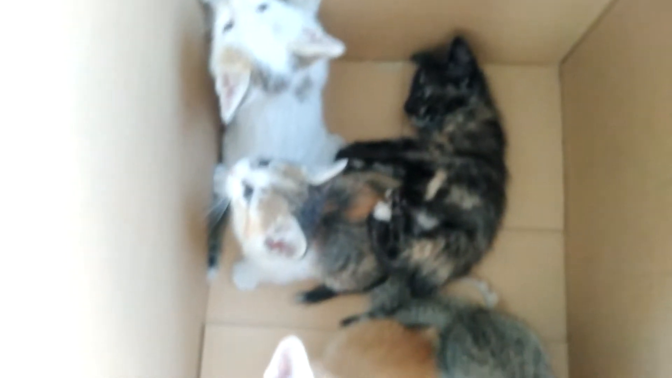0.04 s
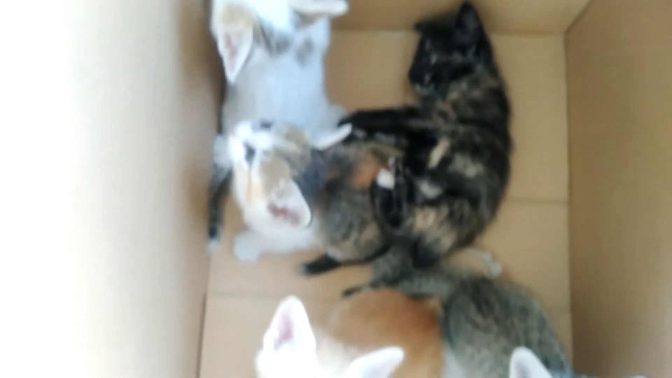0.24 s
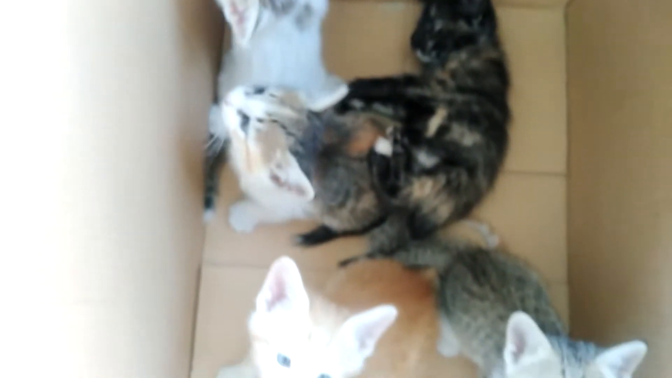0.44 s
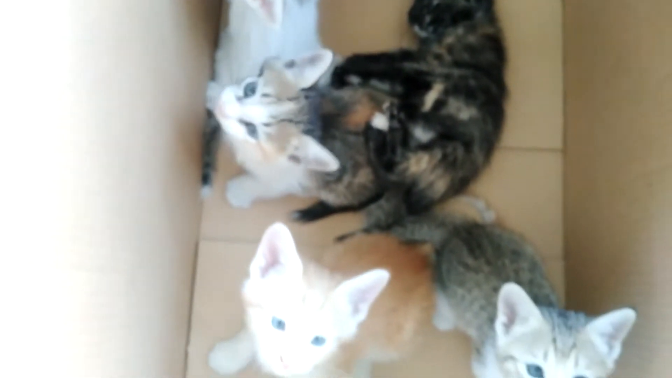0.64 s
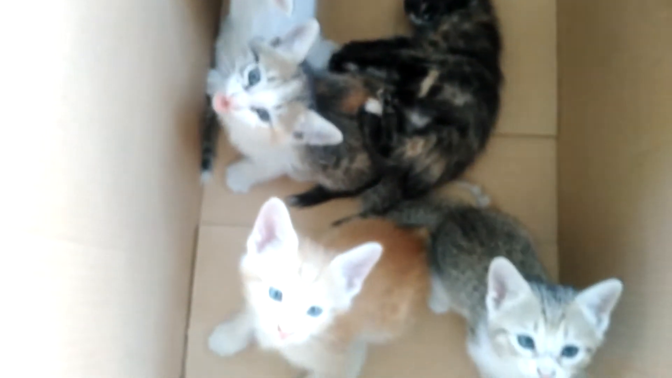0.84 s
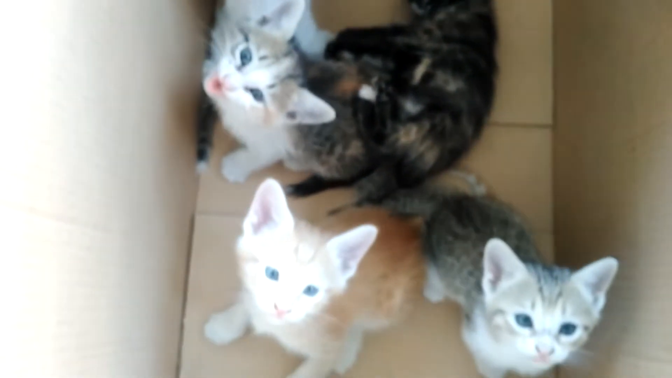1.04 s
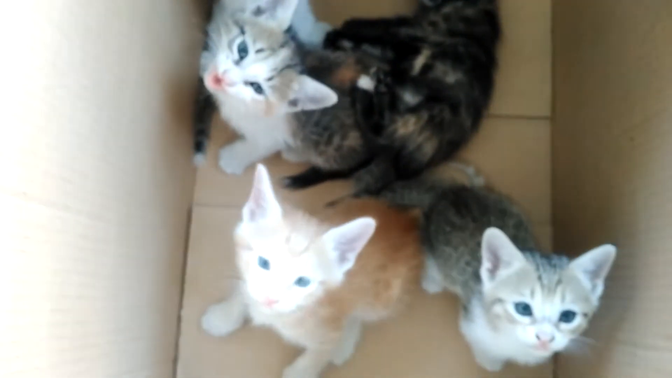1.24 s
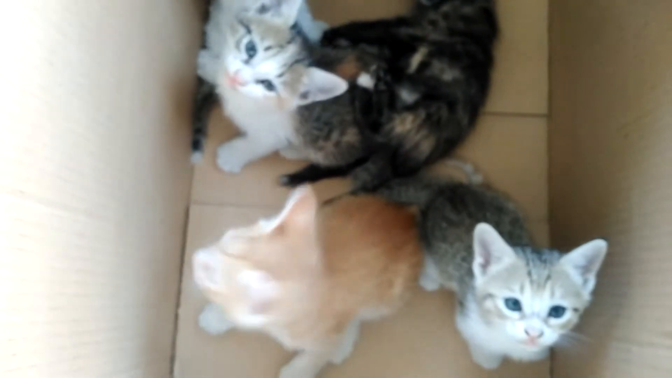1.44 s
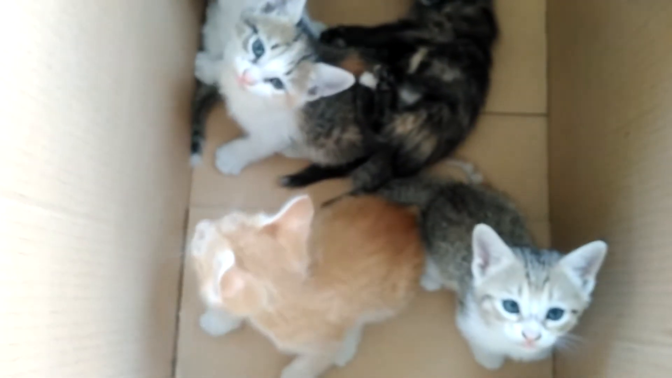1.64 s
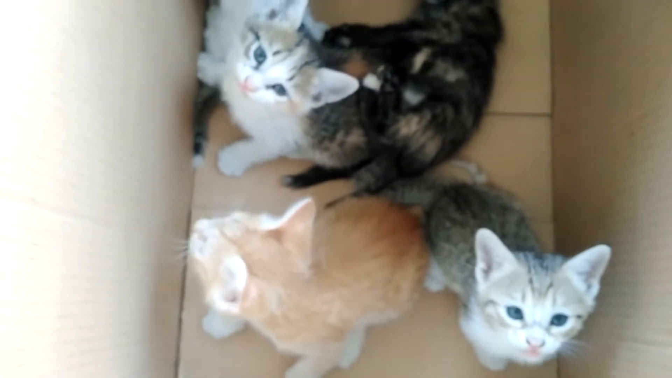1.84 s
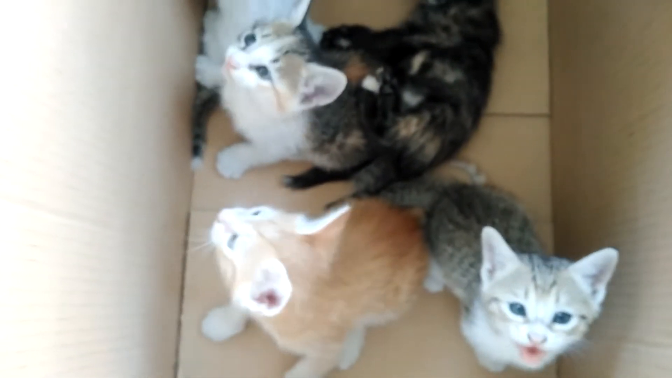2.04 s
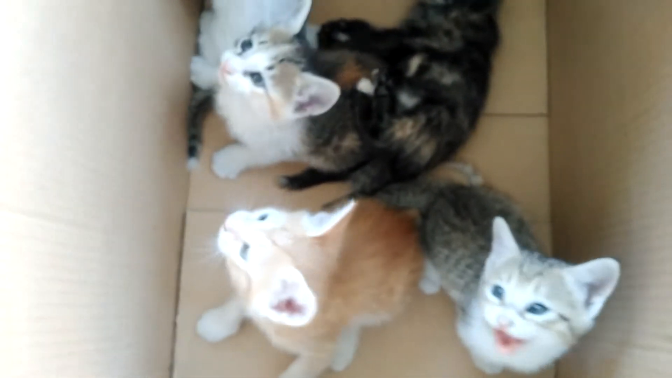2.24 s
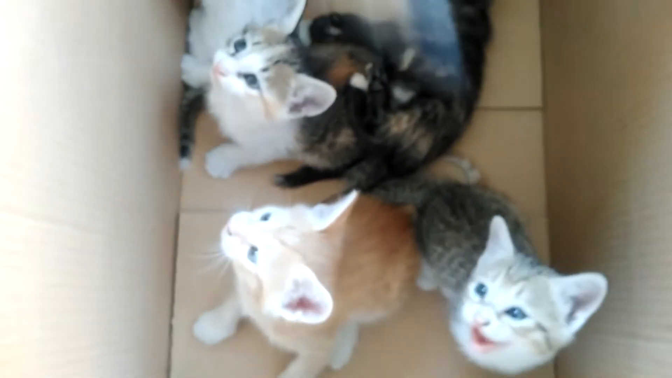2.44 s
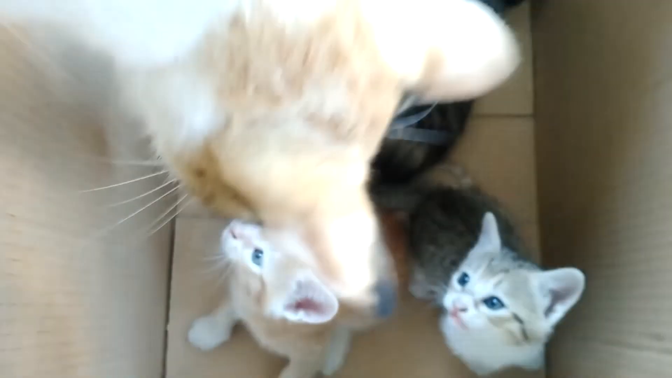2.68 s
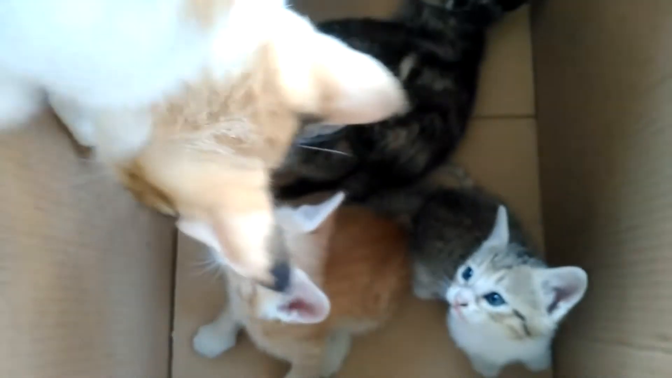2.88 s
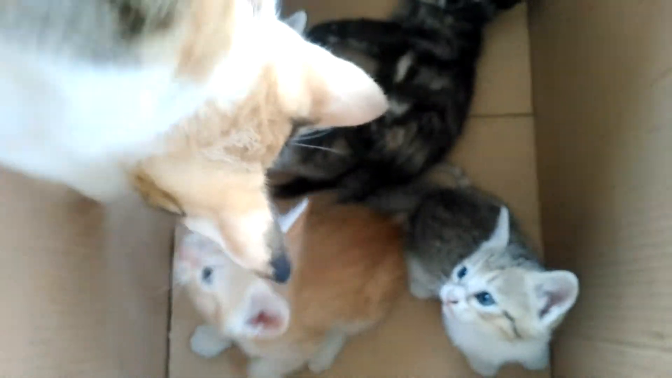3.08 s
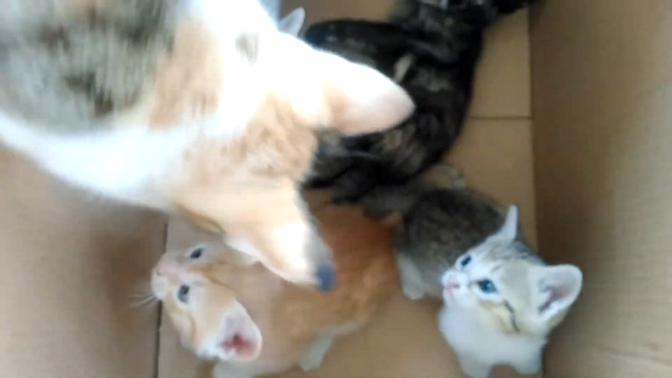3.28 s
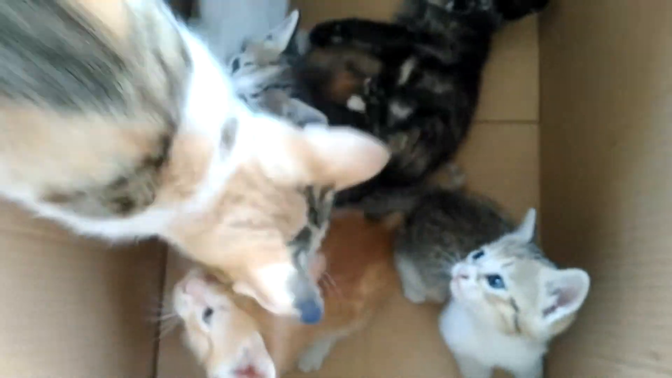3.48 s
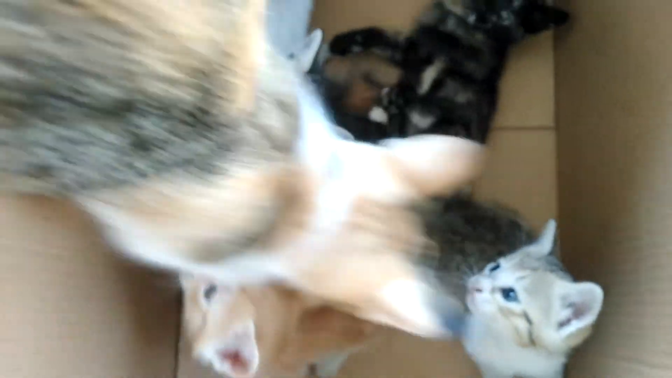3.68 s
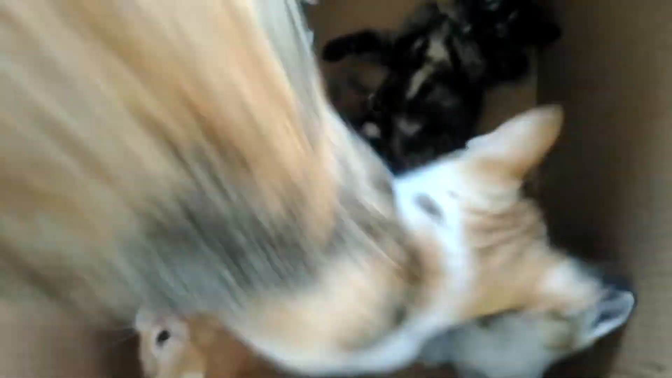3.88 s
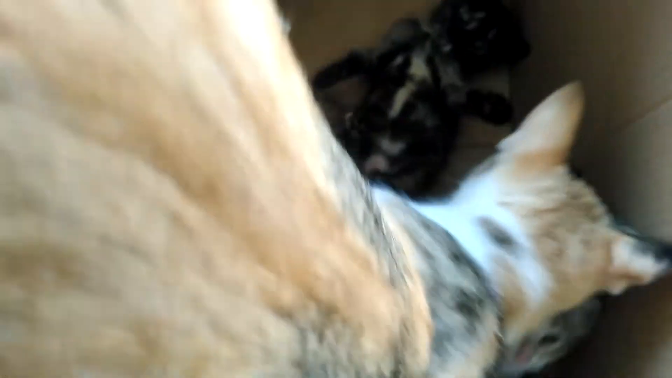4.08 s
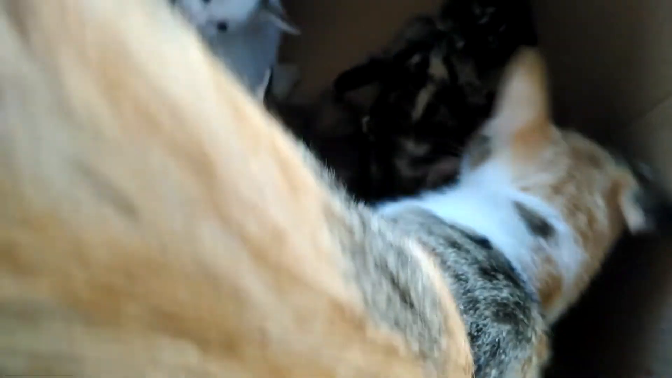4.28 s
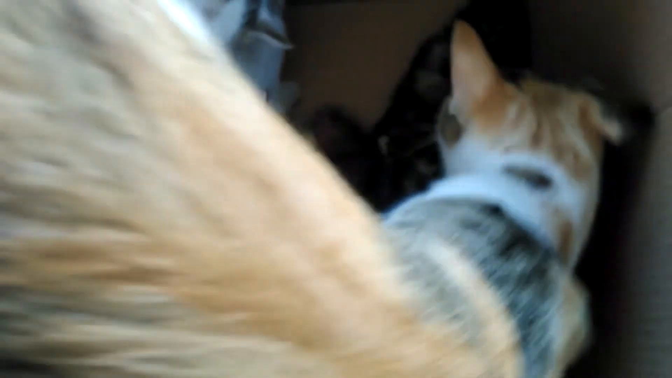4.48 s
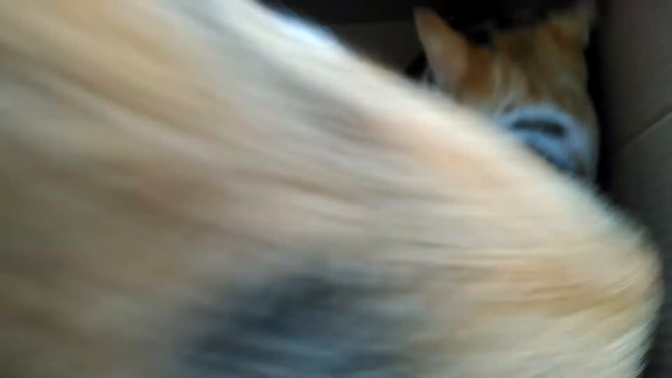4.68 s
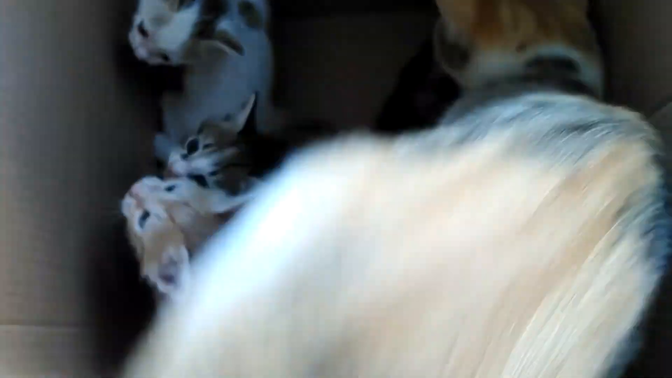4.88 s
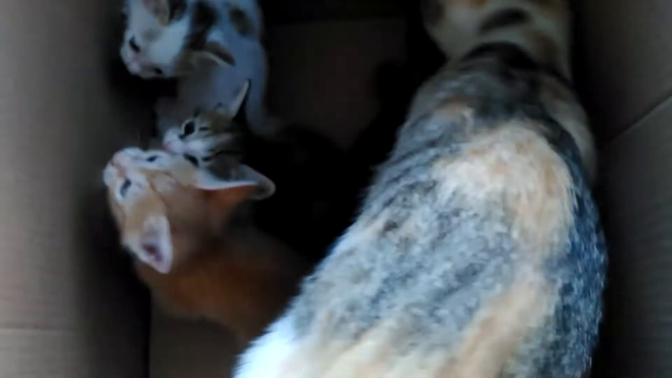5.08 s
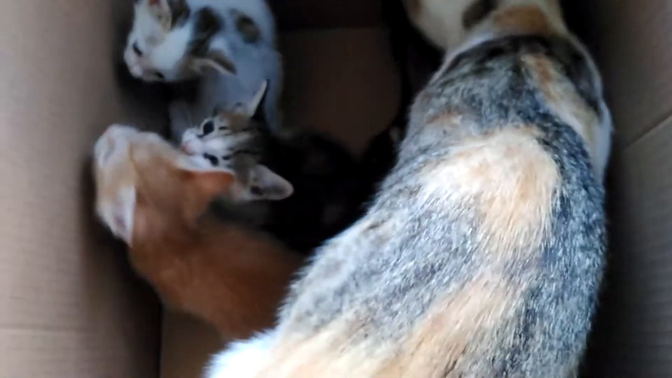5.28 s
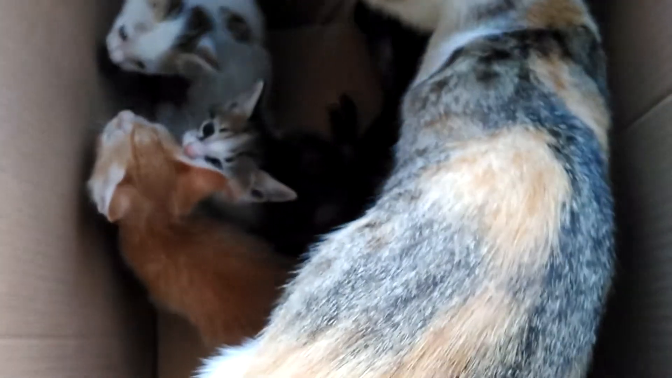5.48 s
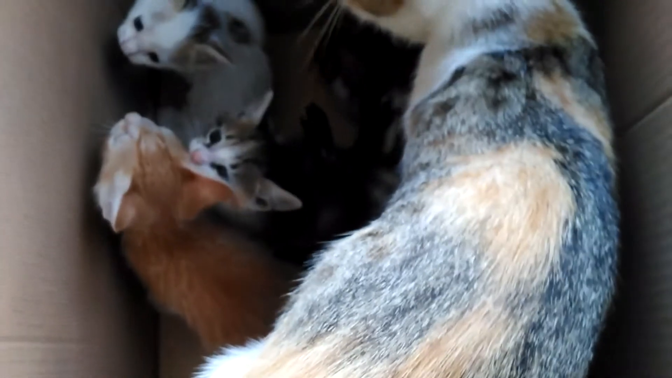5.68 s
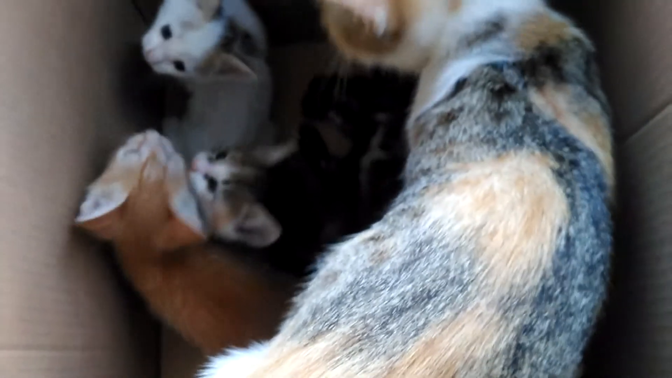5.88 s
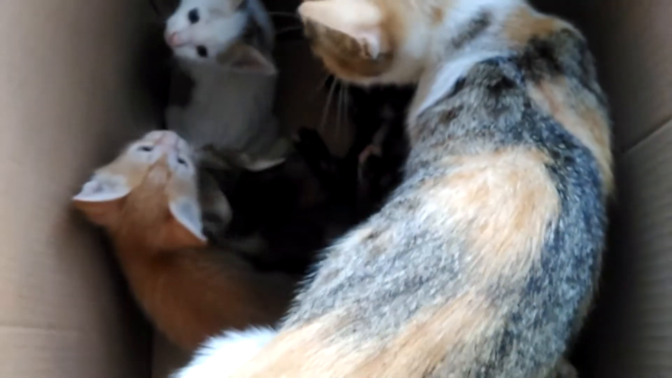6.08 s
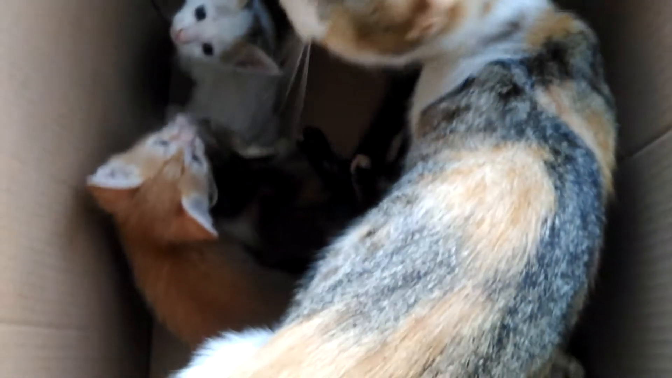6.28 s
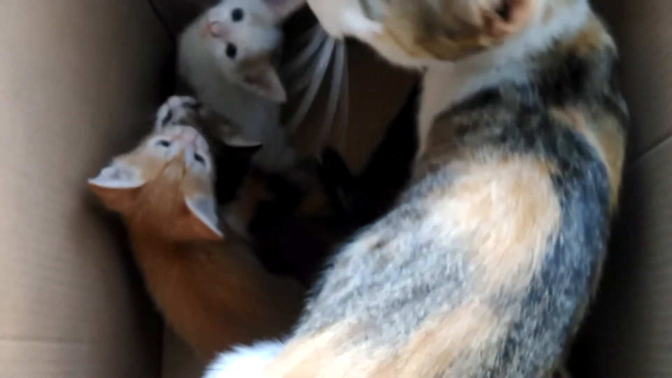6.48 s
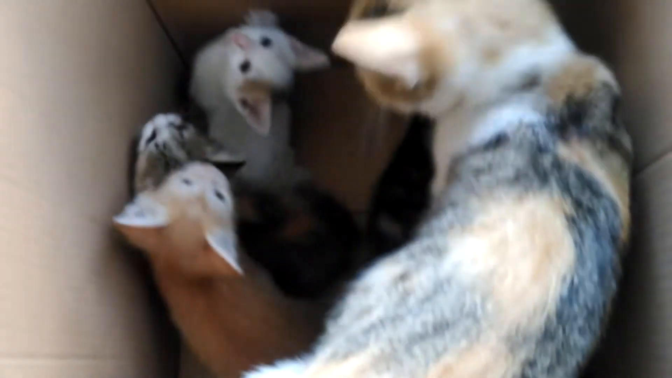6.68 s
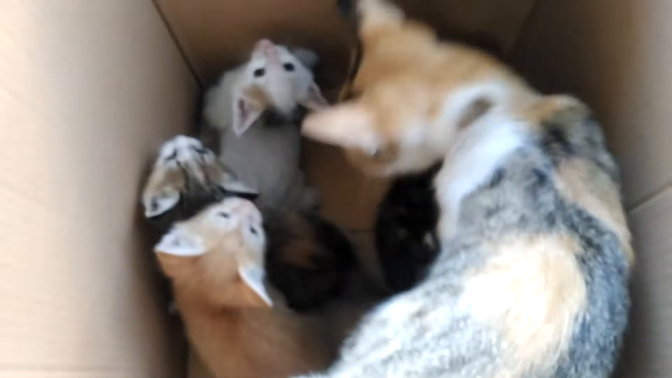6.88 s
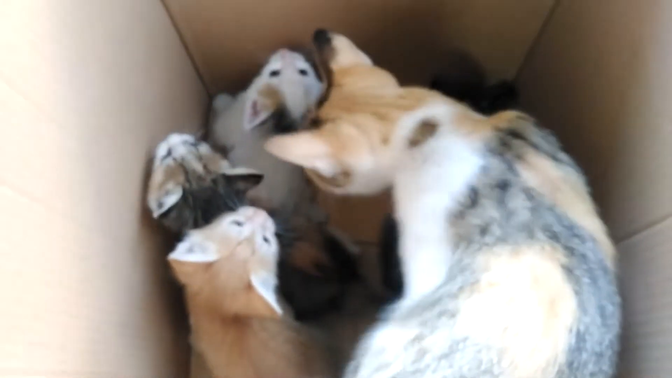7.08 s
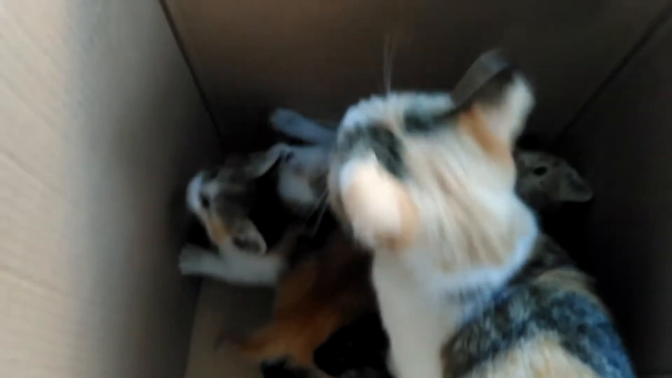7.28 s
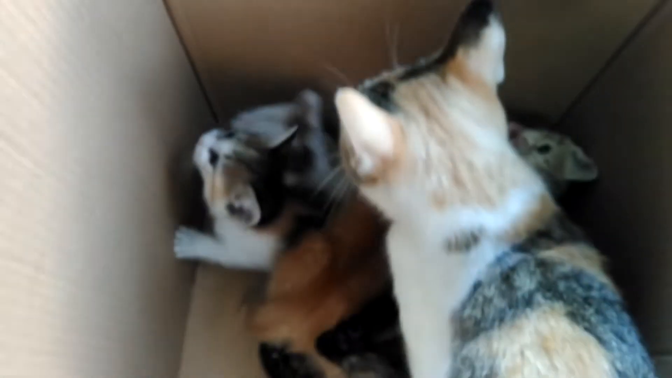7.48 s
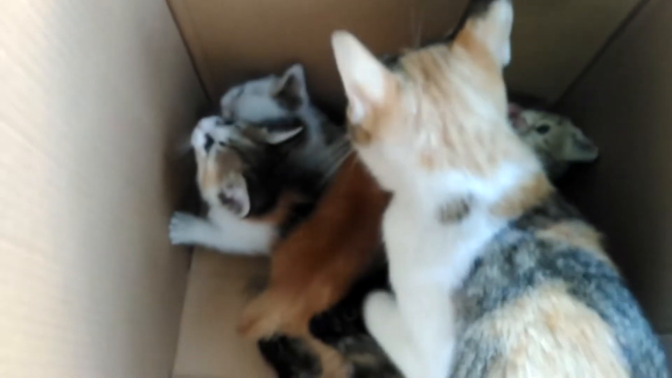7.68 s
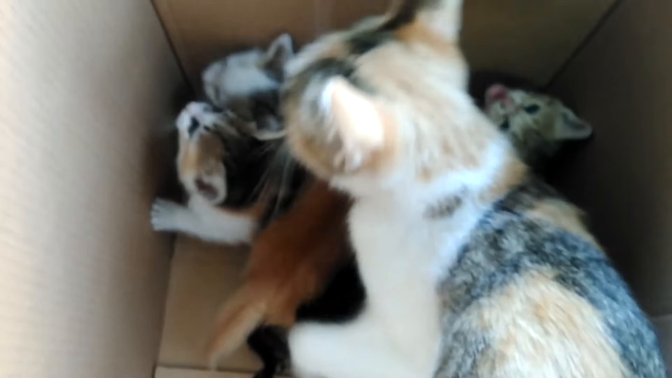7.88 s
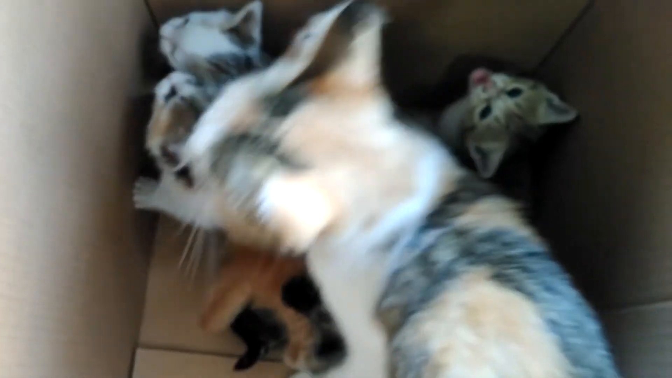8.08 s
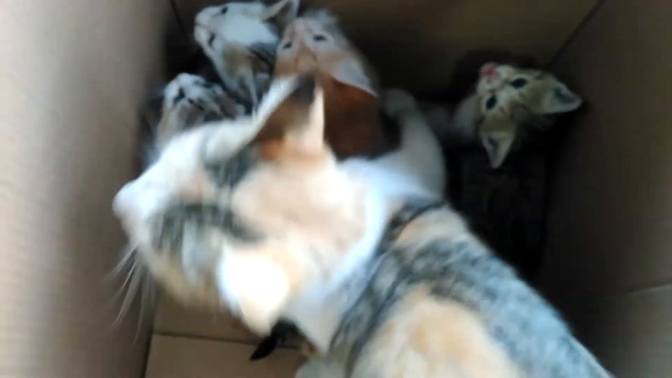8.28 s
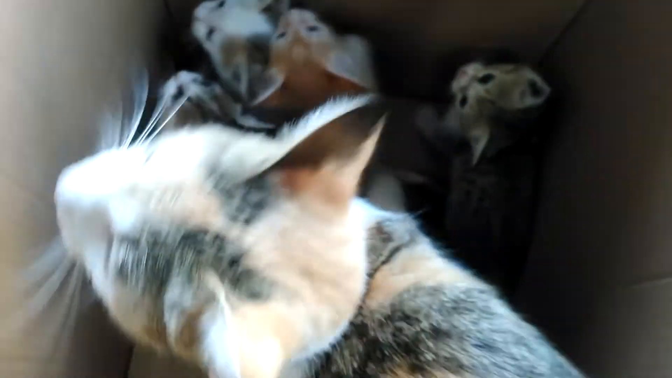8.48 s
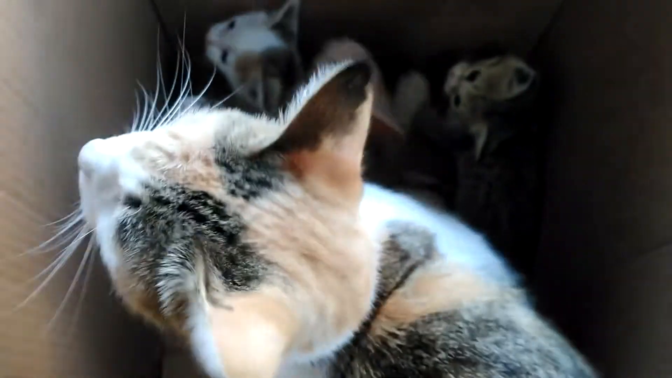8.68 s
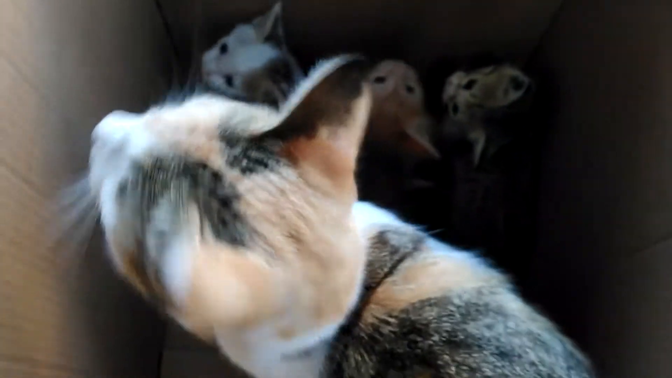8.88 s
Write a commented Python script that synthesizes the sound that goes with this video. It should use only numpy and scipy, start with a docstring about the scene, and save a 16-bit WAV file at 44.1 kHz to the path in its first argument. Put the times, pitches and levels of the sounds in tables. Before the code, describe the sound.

High, raspy kitten mews and a mother cat's quiet low trills, with paws thumping and fur rustling against cardboard.

```python
"""In a cardboard box, just below a hand-held phone, kittens mew; their mother hops in and trills low.
Each cry is a gliding harmonic series from the vocal folds, filtered by the mouth and hoarse at its ends;
standing waves in the box share it unevenly between the phone's two microphone ports.
Paws thump and tap on the cardboard and excite its resonances; friction makes pads scrape and fur rustle."""
import sys
import numpy as np
from scipy import signal
from scipy.fft import rfft, irfft, next_fast_len
from scipy.io import wavfile
from scipy.ndimage import map_coordinates

SR = 44100
rng = np.random.default_rng(int(sys.argv[2]) if len(sys.argv) > 2 else 0)


def dump(signal):
    """Clip the signal to [-1, 1] and save it as 16-bit WAV at the path in sys.argv[1]."""
    limited = np.clip(np.atleast_2d(signal).T, -1, 1)
    pcm = np.round(limited * 32767).astype(np.int16)
    wavfile.write(sys.argv[1], SR, pcm)


N = 393813
T = np.arange(N) / SR
TOP_HZ = 14500
SIDES = np.array([[1], [-1]])  # left, right
# Resonances of a kitten's mouth. Each row: frequency in Hz, relative gain in dB.
MOUTH = [(2000, 3), (3200, 9), (4300, -1.5), (5600, 6.5), (7200, 5), (8800, -1), (11000, -2), (14000, -8)]


def undb(db):
    """Amplitude ratio of a level in decibels."""
    return 10 ** (np.asarray(db) / 20)


def unit(x):
    """The signal scaled to an RMS of 1."""
    return x / np.sqrt(np.mean(x ** 2) + 1e-20)


def curves(table, t):
    """The columns of a table, interpolated linearly in time."""
    times, *columns = np.transpose(table)
    return [np.interp(t, times, column) for column in columns]


def gain_at(points, hz):
    """Gain of a (Hz, dB) spectrum at the given frequencies."""
    f, db = np.transpose(points)
    return undb(np.interp(np.log(np.maximum(hz, 1)), np.log(f), db))


def colour(x, points):
    """Filtering by a (Hz, dB) spectrum."""
    size = next_fast_len(x.shape[-1])
    gain = gain_at(points, np.fft.rfftfreq(size, 1 / SR))
    return irfft(rfft(x, size) * gain, size)[..., :x.shape[-1]]


def band(x, lo_hz, hi_hz, order=2):
    """Band-pass filtering."""
    sos = signal.butter(order, [lo_hz, min(hi_hz, SR * .45)], "band", fs=SR, output="sos")
    return signal.sosfilt(sos, x)


def walk(t, rate):
    """Smooth random fluctuation of spread near 1, with `rate` new values a second."""
    place = (t - t[0]) * rate
    return map_coordinates(rng.standard_normal(len(t) // 8), [place], order=2, mode="wrap")


def noise(length=N):
    """Two independent white noises."""
    return rng.standard_normal((2, length))


def ports(noises, correlation):
    """Partial coherence: the sum and difference of two noises give left and right."""
    return np.sqrt((1 + correlation) / 2) * noises[0] + np.sqrt((1 - correlation) / 2) * noises[1] * SIDES


def add(out, start_s, sound):
    """Superpose a sound on the mix."""
    i = max(int(start_s * SR), 0)
    out[:, i:i + sound.shape[1]] += sound[:, :N - i]


def swell(peak_s, swell_s, fade_s, depth_db=-24.5, rounding=1.427):
    """Envelope of a swell: at depth_db one swell time before its peak and one fade time after."""
    away = np.maximum((peak_s - T) / swell_s, (T - peak_s) / fade_s)
    gain, near = np.zeros(N), away < 3
    gain[near] = undb(depth_db * np.abs(away[near]) ** rounding)
    return gain


def still_air(level_db=-70.5):
    """The noise floor of still air: steady and strongest in the bass."""
    spectrum = [(170, 5), (450, -10), (4500, -34), (7000, -30.5), (14000, -26.5)]
    return unit(colour(ports(noise(), 0.57), spectrum)) * undb(level_db)


def shuffle(rest_db=-72, uneven_db=3):
    """Forced vibration: small feet keep the box floor rumbling, in bouts whose powers add."""
    # Bouts of shuffling. Each row: peak time, swell and fade in seconds, level in dB.
    bouts = [(.41, 0.019, 1, -54), (1.15, 0.26, 0.33, -53), (1.75, 0.13, 0.34, -48.5),
             (2.5, 0.44, 0.36, -43), (3.1, 1, 1, -52.5), (5.25, 1, 0.81, -54), (6.9, 0.88, 1, -53.5),
             (8.15, 0.47, 0.77, -48.5)]
    # Spectrum of the rumble. Each row: frequency in Hz, relative gain in dB.
    spectrum = [(60, -23.5), (130, 0), (190, 5), (270, -1), (370, -61), (600, -16), (900, -50)]
    rumble = unit(colour(ports(noise(), 0.91), spectrum))
    power = undb(rest_db) ** 2 + sum((undb(db) * swell(s, up, down)) ** 2 for s, up, down, db in bouts)
    return rumble * np.sqrt(power) * undb(uneven_db * walk(T, 22))


def rustle(split_hz=4000, grain=0.2, flicker_db=1.77, patchy_db=3.0, brush_fade_s=0.26):
    """Friction and breath noise: fur and paws slip over cardboard, and hoarse cries add their hiss."""
    # Swells of rustle and hiss: fur strokes and the breathy rasp of cries.
    # Each row: peak time, swell and fade in seconds, body and treble levels in dB.
    swells = [(.3, 0.21, 0.2, -85, -77), (1.39, 0.099, 0.1, -54, -51), (1.93, 0.22, 0.11, -68, -54),
              (2.3, 0.51, 0.17, -39.5, -45), (2.42, 0.077, 0.21, -39.5, -40),
              (2.58, 0.036, 0.07, -47.5, -43.5), (2.834, 0.097, 0.032, -50.5, -49),
              (3.035, 0.025, 0.038, -89.5, -55), (3.138, 0.059, 0.074, -99, -61.5),
              (3.299, 0.045, 0.31, -53, -46.5), (3.7, 0.022, 0.079, -51.5, -44),
              (3.92, 0.33, 0.085, -49, -67), (4.145, 0.014, 0.043, -44, -41.5),
              (4.559, 0.17, 0.21, -45.5, -47), (4.749, 0.089, 0.063, -37, -34),
              (4.884, 0.078, 0.34, -48.5, -48), (5.07, 0.01, 0.07, -42.5, -38),
              (5.239, 0.21, 0.13, -31.5, -33), (5.323, 0.011, 0.011, -52, -32.5),
              (5.531, 0.022, 0.099, -31, -36.5), (6.15, .015, 0.47, -74, -59.5),
              (6.79, 0.43, 0.28, -39, -41.5), (7.012, 0.15, 0.078, -25.5, -29.5),
              (7.31, 0.025, 0.17, -50.5, -41.5), (7.49, .15, 0.049, -39.5, -34),
              (8.11, 0.067, 0.35, -37, -40), (8.22, 0.31, 0.22, -36, -35), (8.34, 0.22, 0.076, -36, -40),
              (8.47, 0.12, 0.38, -49, -50.5), (8.872, 0.071, 0.13, -48.5, -47)]
    # The mother's coat brushing the walls. Each row: start and end in seconds, body and treble in dB.
    brushing = [(1.736, 2.864, -61, -56.5), (3.4, 5.706, -61, -55), (6.7, 8.603, -59.5, -56)]
    # Spectrum of the rustle and hiss. Each row: frequency in Hz, relative gain in dB.
    spectrum = [(180, -38.5), (300, 4), (448, -21), (535, 0.5), (867, -4), (1400, 3.5), (2500, 0),
                (3810, -6.5), (5400, 1), (7100, 11.5), (8800, 5), (14000, -4.5)]
    envelopes = [(swell(s, up, down), dbs) for s, up, down, *dbs in swells]
    for start, end, *dbs in brushing:
        outside_s = np.abs(T - np.clip(T, start, end))
        envelopes.append((undb(-24.5 * outside_s / brush_fade_s), dbs))
    body_gain, treble_gain = np.sqrt(sum(np.outer(undb(dbs), gain) ** 2 for gain, dbs in envelopes))
    # the colour shifts: each half octave comes and goes by itself
    edges_hz = 250 * 2 ** np.arange(0, 6, .5)
    patches = sum(band(noise(), hz, hz * np.sqrt(2)) * undb(patchy_db * walk(T, 25)) for hz in edges_hz)
    hiss = colour(ports(patches * np.exp(grain * walk(T, 1500)), 0.013), spectrum)
    body = unit(band(hiss, 356, split_hz, order=4)) * body_gain
    treble = unit(band(hiss, split_hz, TOP_HZ, order=4)) * treble_gain
    return sum(part * undb(flicker_db * walk(T, 70)) for part in (body, treble))


def thumps(rattle_db=-9, left_db=2):
    """Modal response: a paw's push makes the floor boom, duller for a longer contact; the pad scuffs."""
    # Paw landings. Each row: start in seconds, level in dB, contact time in ms, relative scuff in dB.
    landings = [(0.397, -51, 1.4, -29), (1.66, -23.5, 0.28, -20), (2.417, -21, 0.34, -10),
                (2.441, -13, 0.78, -21), (2.754, -14.5, 7, -29), (5.015, -18, 2.4, -47),
                (7.983, -25.5, 3.7, -36.5)]
    # Modes of the box floor. Each row: frequency in Hz, relative level in dB, 60 dB decay in seconds.
    modes = [(67.5, -43, 0.13), (135, -14, 0.075), (159.6, -9, 0.27), (219.7, 8, 0.1), (266, -7.5, 0.096),
             (354, -8.5, 0.064), (530, -7.5, 0.049)]
    out, t = np.zeros((2, N)), T[:SR // 2]
    ring = sum(undb(db - 60 * t / t60) * np.sin(2 * np.pi * hz * t) for hz, db, t60 in modes)
    for start, db, contact_ms, scuff_db in landings:
        push = t * np.exp(-t / (contact_ms / 4000))
        rattle = unit(band(ports(noise(len(t)), 0.95), 88, 310)) * undb(rattle_db - 60 * t / 0.41)
        boom = signal.fftconvolve(ring + rattle, push[None], axes=1)[:, :len(t)] * undb([[left_db], [0]])
        scuff = unit(band(noise(len(t)), 315, 1600, order=1)) * undb(scuff_db - 60 * t / 0.089)
        add(out, start, undb(db) * (boom / np.abs(boom).max() + scuff))
    return out


def span(table, attack_s=0.0051, release_s=0.024):
    """The times of one call, and the envelope that opens and closes it."""
    t = np.arange(table[0][0], table[-1][0] + release_s, 1 / SR)
    return t, np.clip((t - t[0]) / attack_s, 0, 1) * np.clip((t[-1] - t) / release_s, 0, 1) ** 2


def folds(t, hz, hoarse, quaver=0.0035, jitter=0.055):
    """Phase of the oscillating vocal folds: a slight quaver, and cycle-to-cycle jitter when hoarse."""
    pitch = hz * (1 + quaver * walk(t, 54.67) + jitter * hoarse * walk(t, 700))
    return 2 * np.pi * np.cumsum(pitch) / SR


def harmonics(t, hz, level_db, jaw_hz, over_db, pierce_hz, jaw_q=7.2, pierce_db=7, wander_db=4):
    """Formant filtering: the jaw resonance weights the low harmonics, a piercing one the overtones."""
    orders = np.arange(1, 13)[:, None]
    f = orders * hz
    mouth = gain_at(MOUTH, f) * (f < TOP_HZ)
    low = mouth / orders / np.abs(1 - (f / jaw_hz) ** 2 + 1j * f / jaw_hz / jaw_q)
    pierce = undb(pierce_db / (1 + ((f - pierce_hz) / 600) ** 2))
    over = mouth / (1 + (.76 * pierce_hz / f) ** 12) * pierce
    # overtones swell and flicker as they glide through the standing waves of the box
    wander = undb([wander_db * (walk(t, 12.15) + walk(t, 70) / 2) for _ in orders])
    over = over * wander / np.linalg.norm(over * np.sqrt(wander), axis=0)
    return np.hypot(undb(level_db) * low / np.linalg.norm(low, axis=0), undb(over_db) * over)


def mew(table, subharmonic_db, breath_db, pan_db, pierce_hz, register=1, scatter_db=2.5):
    """Source and filter: a kitten's folds sound through its mouth, with rasp, growl and breath."""
    t, gate = span(table)
    hz, level_db, jaw_hz, over_db, hoarse = curves(table, t)
    hz = hz * register
    phase = folds(t, hz, hoarse)
    voice = 0
    for k, size in enumerate(harmonics(t, hz, level_db, jaw_hz, over_db, pierce_hz), 1):
        # standing waves give each harmonic its own level and phase at each port
        balance = undb(SIDES * (pan_db * (k == 2) / 2 + scatter_db * walk(t, 13.9)))
        balance /= np.sqrt((balance ** 2).mean(0))
        lag = (1.35 + .5 * walk(t, 7.12)) / 2 * (-1) ** k
        # chaotic folds smear each harmonic into a band of rasp, the higher ones more
        chaos = (walk(t, 900) + 1j * walk(t, 900)) / np.sqrt(2)
        rasp = np.minimum(hoarse * np.sqrt(k), 1)
        tone = np.sqrt(1 - rasp ** 2) * undb(1.5 * walk(t, 45.03)) + rasp * chaos
        if k > 1:  # period doubling: strained folds put lines halfway between weakened harmonics
            doubling = undb(subharmonic_db) * np.minimum(hoarse, .3) * np.cos(phase / 2)
            tone = tone * np.sqrt(1 - hoarse) * (1 + doubling)
        voice += size * balance * np.imag(tone * np.exp(1j * (k * phase + SIDES * lag)))
    # a hoarse voice also rings the jaw resonance itself, whatever the pitch
    drive = np.array([walk(t, 550) + 1j * walk(t, 550) for _ in SIDES]) / np.sqrt(2)
    growl = np.imag(drive * np.exp(2j * np.pi * np.cumsum(jaw_hz) / SR))
    voice += undb(level_db) * hoarse * np.minimum(2 * hoarse, 1) * growl
    # air escapes once a cycle through the same mouth
    breath = unit(colour(band(noise(len(t)), 6500, 10000), MOUTH)) * (1 + np.cos(phase))
    return gate * (np.sqrt(2) * voice + undb(over_db + breath_db) * breath)


def squeal(table, *voice, start_s=.847, end_s=.947, flip_s=0.0084, ratio=1.351):
    """Register break: the voice jumps up for a moment; the two registers overlap at each flip."""
    t, _ = span(table)
    blend = np.clip(np.minimum(t - start_s, end_s - t) / flip_s + .5, 0, 1) * np.pi / 2
    return np.cos(blend) * mew(table, *voice) + np.sin(blend) * mew(table, *voice, register=ratio)


def kittens():
    """Superposition of the kittens' cries, each with its own glide and timbre."""
    # Contours of the cries. Each row: time in seconds, pitch in Hz, level in dB,
    # jaw resonance in Hz, overtone level in dB, hoarseness from 0 to 1.
    falling_squeal = [(0.817, 1605, -46.5, 2760, -52, 0.33), (0.85, 1733, -46.5, 3100, -45.5, 0.17),
                      (0.9, 1833, -41.5, 3200, -49, 0.13), (0.945, 1750, -35.5, 2870, -46, 0.11),
                      (1.02, 1820, -43.5, 2700, -42.5, 0.09), (1.11, 1648, -36, 2200, -49.5, 0),
                      (1.26, 1503, -31.5, 1630, -51.5, .01), (1.335, 1373, -32, 1520, -53, 0),
                      (1.372, 1199, -42.5, 1753, -58, 0.18), (1.388, 896, -41.5, 1358, -64, 0.11)]
    raspy_mew = [(1.855, 1248, -37, 1730, -59, 0.22), (1.9, 1217, -40.5, 1760, -41, 0.075),
                 (1.96, 1324, -39, 2100, -46, 0.038), (2.13, 1311, -35, 2900, -44, 0.08),
                 (2.24, 1277, -32.5, 3420, -44, 0.49), (2.34, 1216, -29, 3580, -41.5, 0.25),
                 (2.41, 1178, -29.5, 3430, -43, 0.33), (2.445, 1048, -42, 2722, -59.5, 0.21),
                 (2.47, 793, -35, 1146, -66, 0.11)]
    joining_mew = [(1.93, 929, -43.5, 1860, -60.5, 0.08), (2.0, 862, -50, 1720, -71, .12),
                   (2.06, 1075, -51, 1700, -52.5, 0.36), (2.24, 1297, -48, 2300, -43, 0.36),
                   (2.34, 1345, -30, 2710, -52.5, 0.041), (2.45, 1297, -37.5, 2470, -67.5, 0.055),
                   (2.495, 1190, -42.5, 1780, -43, .05)]
    soft_mew = [(3.69, 614, -48.5, 810, -56, 0.3), (3.745, 477, -46.5, 760, -73, 0.1),
                (3.79, 657, -46, 1110, -77, 0.12), (3.83, 917, -54, 2300, -59, 0.41),
                (3.88, 1110, -48.5, 2720, -43.5, 0.2), (4.05, 1219, -46.5, 1500, -47.5, 0.039),
                (4.28, 1193, -43, 2232, -52, 0.0085), (4.43, 1111, -47, 2045, -48.5, 0.031),
                (4.46, 1006, -44, 1920, -60, 0.08)]
    loud_mew = [(6.13, 578, -51, 685, -81, .05), (6.18, 678, -46, 826, -71, 0.069),
                (6.28, 1247, -47.5, 1820, -63, 0.4), (6.305, 1450, -32.5, 1670, -53, 0.23),
                (6.35, 1601, -38, 2400, -47.5, 0.064), (6.41, 1520, -37, 2260, -39, 0.077),
                (6.46, 1561, -27, 2820, -41, 0.023), (6.545, 1452, -20.5, 2850, -43, 0.0062),
                (6.61, 1496, -30, 2470, -47.5, 0.02), (6.68, 1434, -29, 2720, -48, 0.023),
                (6.725, 1145, -41, 1870, -53, 0.17)]
    shrill_mew = [(6.88, 1217, -41, 1700, -57, 0.48), (6.97, 1249, -35.5, 2060, -49, 0.2),
                  (7.05, 1242, -36, 2150, -45, 0.068), (7.192, 1157, -39.5, 2130, -44.5, 0.06),
                  (7.222, 831, -34, 1600, -70, 0.32)]
    long_wail = [(7.21, 1117, -40, 2310, -58, 0.05), (7.45, 1071, -40.5, 2295, -60, 0.066),
                 (7.64, 1166, -42, 2720, -51, 0.28), (7.69, 1398, -39.5, 2050, -47.5, 0.41),
                 (7.8, 1562, -39, 2690, -49, 0.49), (8.03, 1480, -42, 2493, -55, 0.745),
                 (8.1, 1330, -37, 2300, -60, 0.61)]
    rising_mew = [(8.42, 644, -45, 860, -60, 0.12), (8.48, 621, -39.5, 980, -71, 0.08),
                  (8.52, 782, -43.5, 1630, -78, 0.07), (8.56, 984, -37, 1350, -83, 0.16),
                  (8.605, 1215, -38, 2200, -46.5, 0.059), (8.68, 1303, -32.5, 2487, -46.5, 0.05),
                  (8.78, 1391, -30.5, 2365, -37.5, 0.025), (8.89, 1389, -28.5, 2490, -42, 0.082),
                  (8.925, 1332, -25, 2540, -39, 0.03)]
    # Each row: kind of cry, contour, relative subharmonics and breath in dB,
    # second harmonic's left-minus-right level in dB, piercing resonance in Hz.
    cries = [(squeal, falling_squeal, -14, -24, -1, 7300), (mew, raspy_mew, 4, -12, -5, 5300),
             (mew, joining_mew, 5, -10, -3, 6500), (mew, soft_mew, -12, -20, 7, 5900),
             (mew, loud_mew, -3, -15, -12, 7100), (mew, shrill_mew, -5, -18, -3, 6500),
             (mew, long_wail, 4, -14, -3, 6700), (mew, rising_mew, -8, -17, 12, 6900)]
    out = np.zeros((2, N))
    for cry, table, *voice in cries:
        add(out, table[0][0], cry(table, *voice))
    return out


def clicks(ring_db=-11, treble_db=-9, t60=0.057, width=1.52):
    """Damped transients: a claw tap or abrupt yelp is a snap, a dull ring and a faint bright tick."""
    # Sharp clicks: claw taps on cardboard, and the abrupt yelp that ends a cry.
    # Each row: start in seconds, snap peak in dB, ring frequency in Hz.
    transients = [(1.377, -37.5, 1020), (2.842, -27, 1086), (3.687, -44.5, 600), (4.471, -28.5, 1200),
                  (4.982, -25, 1300), (7.044, -19.5, 1300), (7.213, -27, 1490), (7.497, -22, 1700),
                  (7.502, -20, 960), (8.553, -28, 745)]
    out, t = np.zeros((2, N)), T[:SR // 5]
    for start, db, hz in transients:
        snap = band(1. * (t == 0), hz / width, hz * width)
        drive = ports(noise(len(t)), 0.45)
        ring = unit(band(drive, hz / width, hz * width))
        tick = undb(treble_db) * unit(band(drive, 2900, 10300))
        decay = undb(ring_db - 60 * t / t60)
        add(out, start, undb(db) * (snap / np.abs(snap).max() + (ring + tick) * decay))
    return out


def trill(table, flutter_origin_s=0, flutter_hz=40, slowing_hz_per_s=0, throb=0, warble=0,
          hoarse=0.18, rolloff_db=-6, uneven=0.89, muffle_hz=1800):
    """Modulation of a closed-mouth call: a flutter rocks amplitude by `throb` and pitch by `warble`."""
    t, gate = span(table)
    hz, level_db, over_db = curves(table, t)
    since = t - flutter_origin_s
    beats = since * (flutter_hz - slowing_hz_per_s * since / 2)
    flutter = np.cos(2 * np.pi * beats + uneven * walk(t, 30))
    phase = folds(t, hz * (1 + warble * flutter), hoarse, jitter=0.2)
    tone = np.sin(phase)
    for k in range(2, 6):
        size = undb(over_db + rolloff_db * (k - 2) + 1.8 * walk(t, 78.5))
        muffling = 1 + (k * hz / muffle_hz) ** 10  # the closed mouth is a low-pass filter
        tone += size * np.sin(k * phase) / muffling
    voice = undb(level_db + 2.1 * walk(t, 69.8)) * tone
    return np.sqrt(2) * gate * (1 + throb * flutter) * np.array([voice, voice])


def mother():
    """Low voiced answers: three modulated trills, and two grunts and a coo without flutter."""
    # Contours of the calls. Each row: time in seconds, pitch in Hz, level in dB,
    # relative overtone level before muffling in dB.
    first_trill = [(1.775, 603, -50.5, -6), (1.86, 565, -47.5, -3.5), (1.916, 530, -43, -7)]
    greeting_trill = [(3.258, 562, -50, -5), (3.292, 544, -43, -1.5), (3.37, 530, -49, -2),
                      (3.455, 612, -52.5, -2.5)]
    falling_grunt = [(3.464, 507, -44, -3), (3.48, 440, -32, -9.5), (3.494, 380, -41.5, -9.5),
                     (3.525, 472, -42.5, -15)]
    long_trill = [(5.343, 690, -50, 8), (5.388, 589, -49, 0), (5.48, 557.4, -43, 1),
                  (5.568, 572.6, -41, -7), (5.621, 496.6, -37.5, -6), (5.71, 491, -41, -12.5),
                  (5.775, 552, -40.5, -16), (5.8, 477, -35.5, -16.5), (5.843, 481, -44, -17)]
    smooth_coo = [(6.72, 813, -53, -9), (6.8, 756, -46.5, -4), (7.07, 778.5, -46, -7),
                  (7.185, 760, -49, -7)]
    short_grunt = [(7.905, 570, -51, -2), (7.95, 410, -52, -16)]
    out = np.zeros((2, N))
    add(out, first_trill[0][0],
        trill(first_trill, flutter_origin_s=2.0, throb=0.36, warble=0.081, hoarse=0.22))
    add(out, greeting_trill[0][0],
        trill(greeting_trill, flutter_origin_s=3.293, flutter_hz=37.6, throb=0.69, warble=0.017,
              hoarse=0.61, rolloff_db=-19))
    add(out, long_trill[0][0],
        trill(long_trill, flutter_origin_s=5.46, flutter_hz=42.74, slowing_hz_per_s=42, throb=-0.36,
              warble=0.079, hoarse=0.22, rolloff_db=-4, uneven=.7))
    for table in falling_grunt, smooth_coo, short_grunt:
        add(out, table[0][0], trill(table))
    return out


def scrapes(grain=0.49, width=1.234):
    """Stick-slip friction: a pad drags on a wall, which answers with one broad, hollow resonance."""
    # Pad drags. Each row: peak time, swell and fade in seconds, level in dB, resonance in Hz.
    drags = [(4.477, 0.0042, 0.13, -42, 890), (4.721, 0.068, 0.21, -41.5, 602),
             (6.8, 0.085, 0.54, -45, 635), (6.88, 0.14, 0.29, -47.5, 351), (7.02, 0.7, 0.07, -43.5, 610),
             (8.26, 0.106, 0.2, -46.5, 358), (8.84, 0.27, 0.25, -57.5, 350)]
    slips = ports(noise(), 0.79) * np.exp(grain * walk(T, 160))
    return sum(unit(band(slips, hz / width, hz * width)) * undb(db) * swell(s, up, down)
               for s, up, down, db, hz in drags)


def room(x, wet_db=-17, t60=.2):
    """Reverberation: reflections from the box and the room add a short, exponentially decaying wash."""
    t = T[:SR // 2]
    tail = band(noise(len(t)), 230, 16000, order=1) * undb(-60 * t / t60) * (t > .003)
    tail /= np.sqrt((tail ** 2).sum(1, keepdims=True))
    return x + undb(wet_db) * signal.fftconvolve(x, tail, axes=1)[:, :N]


def scene():
    """Superposition: voices and contact sounds reverberate over the floor's rumble and still air."""
    direct = kittens() + mother() + rustle() + scrapes() + thumps() + clicks()
    return room(direct) + shuffle() + still_air()


def record(dry):
    """Band limiting: the phone thins the deep bass and cuts the top."""
    thinned = signal.sosfilt(signal.butter(4, 52, "high", fs=SR, output="sos"), dry)
    return signal.sosfilt(signal.ellip(10, .2, 70, TOP_HZ, fs=SR, output="sos"), thinned)


dry = scene()
out = record(dry)
dump(out)
```